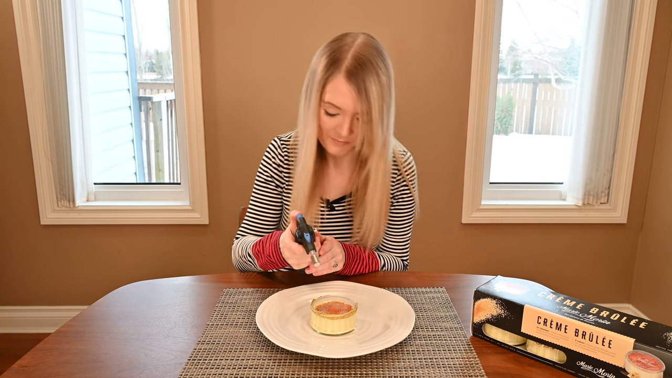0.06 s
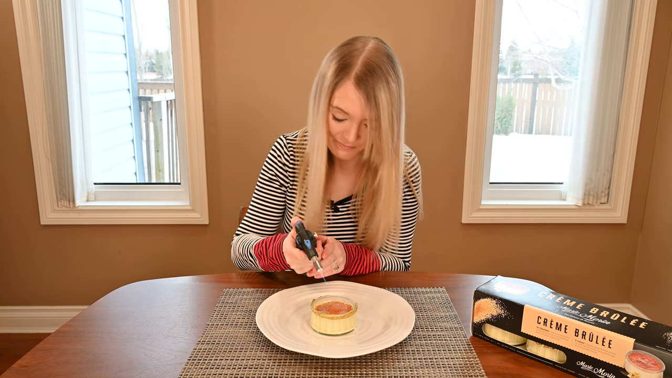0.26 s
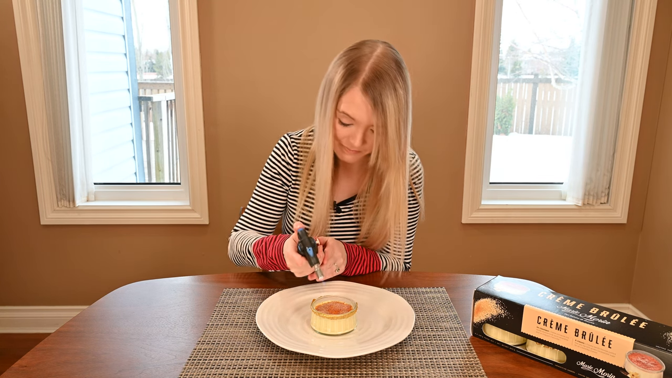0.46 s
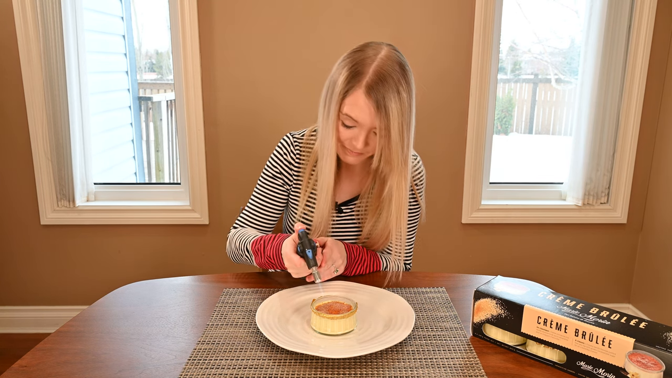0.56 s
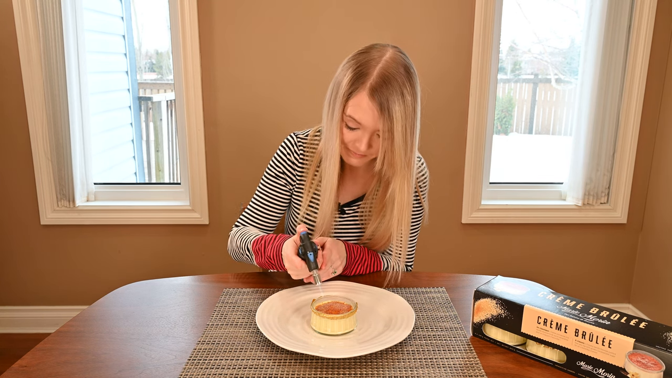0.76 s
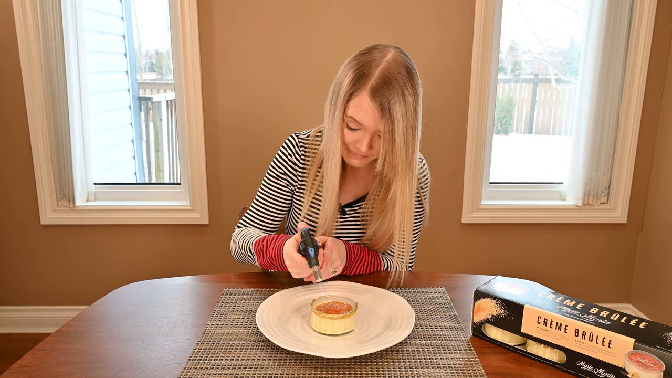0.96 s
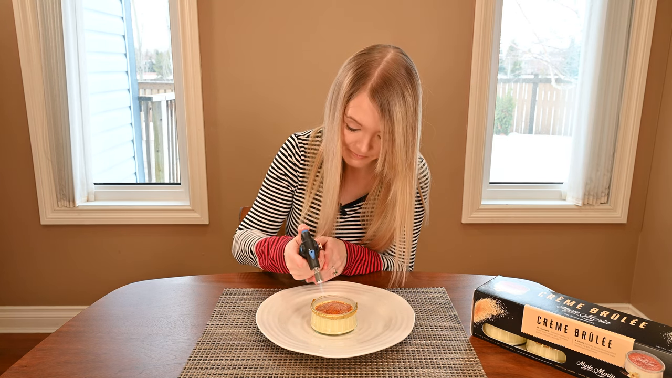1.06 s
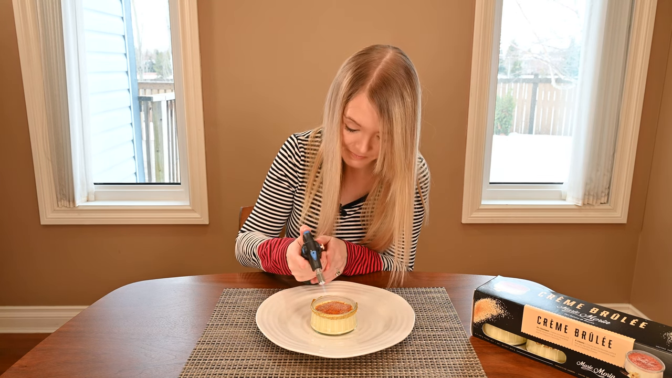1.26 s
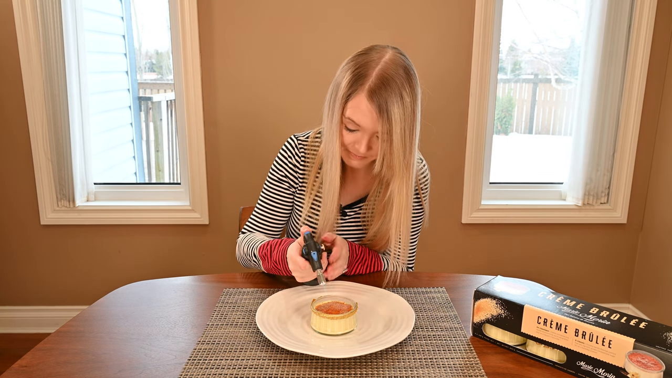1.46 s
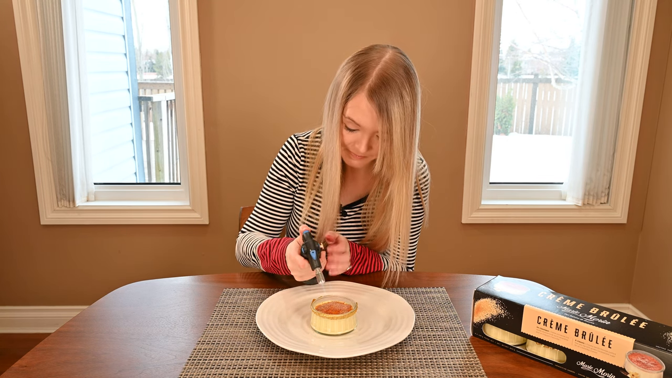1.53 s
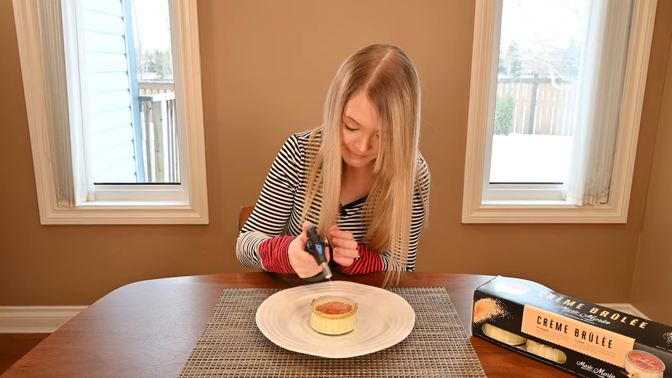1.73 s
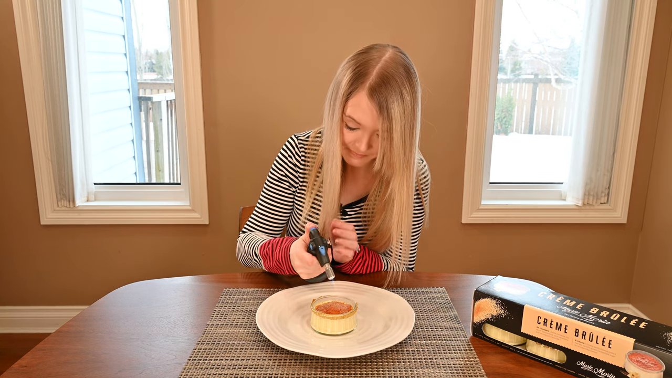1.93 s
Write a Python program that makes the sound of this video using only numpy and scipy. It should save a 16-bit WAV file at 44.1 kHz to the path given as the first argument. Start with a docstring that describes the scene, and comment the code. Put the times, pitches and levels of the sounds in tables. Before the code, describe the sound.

A handheld gas torch clicks, snaps alight with a soft thump, then hisses and roars steadily indoors.

```python
"""In a small hard-walled room with quiet air and a faint hum (sine tones), a hand rustles softly (noise).
The trigger of a gas torch clicks (bursts of tiny knocks ringing the grip) and gas starts to hiss
(noise shaped by the barrel). The igniter snaps (a burst ringing its housing), the gas catches with
a soft thump (two dying low tones) and the flame settles to a low roar (low noise) under the hiss.
Echoes and a dying tail add the room to the clicks, hiss and roar."""
import sys
import numpy as np
from scipy import signal
from scipy.fft import rfft, irfft
from scipy.io import wavfile
from scipy.ndimage import uniform_filter1d

SR = 44100
rng = np.random.default_rng(int(sys.argv[2]) if len(sys.argv) > 2 else 0)


def wav_out(sig):
    """Save sig, one row per channel (or a flat mono array), as 16-bit PCM at SR to the path in sys.argv[1]."""
    wavfile.write(sys.argv[1], SR, np.round(np.clip(np.atleast_2d(sig).T, -1, 1) * 32767).astype(np.int16))


N = 88200  # samples: 2 seconds

# tone colour of the quiet air: (frequency [Hz], relative level per Hz [dB])
AIR_COLOUR = [(18, -26), (30, -8.5), (278, 10.5), (521, -6.5), (752, -41), (1490, 0), (2710, -15.5),
              (4020, -11.5), (10300, -14), (15700, -30)]
AIR_DB = -72
# faint rustle of the hand before the gas is lit: (time [s], level [dB])
RUSTLE_LEVEL = [(0, -80), (.025, -73), (.05, -104), (.105, -78), (.125, -63.5), (.16, -67), (.22, -67),
                (.28, -77), (.3, -103)]
RUSTLE_HZ, RUSTLE_WIDTH_HZ = 1400, 2600
# appliance hum: (frequency [Hz], rms level [dB])
HUM_TONES = [(120, -82), (240, -91.5), (510, -80)]

# trigger clicks: (time [s], rough peak [dB], time for the slip to fall 60 dB [s],
#                  treble tilt [dB per octave], low edge [Hz])
TRIGGER_SLIPS = [(.0748, -53.5, 0.06, -0.5, 900), (.1084, -28.5, 0.014, 0.5, 500),
                 (.1215, -38.5, 0.0084, -8.5, 900), (.2290, -28.5, .005, 3.5, 1200),
                 (.2401, -10, 0.0067, 4, 1100)]
# ring of the plastic grip: (frequency [Hz], level [dB])
GRIP_RING = [(1200, -9.5), (1900, 5), (3450, 3), (4150, 5.5), (4860, 12.5), (5700, 8.5), (8350, 9),
             (11500, 3), (15400, -3.5)]
GRIP_T60_CYCLES, GRIP_LONGEST_T60_S = 24, .008  # each ring falls 60 dB in 24 cycles, or in 8 ms if sooner
# bare crack of a slip, without the ring: (frequency [Hz], level [dB])
CRACK_COLOUR = [(200, -33), (700, -62.5), (1500, -11.5), (3000, -42), (6500, 16.5), (10000, -38.5),
                (16000, -20)]
GRIP_CRACK_DB, HOUSING_CRACK_DB = 9.5, 12.5
SLIP_RISE_S = .0004
BLUR_HZ, SHARP_SHARE = 1500, 0.22  # for the sound sent to the room: blur width, share left sharp

# single echoes: (time [s]) and, in the same order, (level [dB])
ECHO_TIMES = [.0022, .0082, .0128, .0192]
ECHO_LEVELS = [-18, -24, -24.5, -22]
# how long the room tail lasts: (frequency [Hz], time to fall 60 dB [s])
TAIL_T60 = [(300, 0.23), (1300, 0.6), (3500, 0.52), (9000, 0.378), (15000, 0.06)]
# tone colour of the room tail: (frequency [Hz], relative level [dB])
TAIL_COLOUR_POINTS = [(300, -3), (1300, 8), (3500, -1), (6500, 2.5), (9000, 2.5), (15000, 12)]
TAIL_DB, TAIL_START_S = -12, 0.0047
BURN_ROOM_DB = 2.5  # extra room sound for the hiss and roar

# gas flow: (time [s], level of the main barrel resonance [dB])
GAS_FLOW = [(.13, -92), (.148, -62.5), (.19, -58), (.3, -52.5), (.5, -57.5), (.8, -57.5), (1.1, -57),
            (1.4, -58), (1.7, -58), (2, -57.5)]
BARREL_HZ, BARREL_SKIRT_DB = 4616, -10
BARREL_UNLIT_WIDTH_HZ, BARREL_LIT_WIDTH_HZ, BARREL_WIDENING_S = 500, 940, 0.058
# upper barrel resonances: (frequency [Hz], width [Hz])
BARREL_OVERTONES = [(6400, 500), (7750, 920), (11000, 2200), (13400, 1100), (15600, 690)]
# their levels as the nozzle turns: (time [s], then one level against the flow per resonance [dB])
NOZZLE_AIM = [(.15, -10, -37, -19, -28, -30), (.22, -15, -34, -24, -10, -10),
              (.47, -21.5, -14, -17, -13, -22), (.67, -31, -11, -17, -19, -16),
              (.9, -23, -8, -13.5, -14, -14), (1.1, -23, -14, -16, -13, -16.5),
              (1.4, -16, -13, -16.5, -12, -13), (1.65, -23, -14.5, -15, -16, -16),
              (1.8, -26.5, -16.5, -26, -16, -27), (2, -25, -14.5, -32, -25, -19)]
# broad hiss of the jet: (frequency [Hz], relative level per Hz [dB])
JET_COLOUR = [(1500, 4), (2500, 0.5), (3500, -2), (5500, 0), (8500, -1), (9500, -7), (12500, -1),
              (15700, -6.5)]
JET_DB = -11  # against the flow
SPIT_DB = 0.72  # flicker of the treble hiss
PATCHY_DB = 1  # drifting unevenness of hiss and roar

# igniter hammer: (time [s], rough peak [dB], time for the slip to fall 60 dB [s],
#                  treble tilt [dB per octave], low edge [Hz])
IGNITER_SLIPS = [(.2730, -3, 0.0027, 2.5, 400), (.2744, -20.5, 0.0036, 7, 412)]
# ring of the igniter housing: (frequency [Hz], level [dB], time to fall 60 dB [s])
HOUSING_RING = [(1380, -0.5, 0.03), (3357, 0, 0.038), (3930, 5.5, 0.015), (5830, 8, .005),
                (9070, 9, 0.00358), (10750, 3.5, 0.0084), (13400, 6.5, 0.0016), (13330, 2, 0.0046)]

# thump: start, overall level before the low cut, and two tones that each fall 60 dB in their T60
THUMP_S, THUMP_DB, THUMP_CUT_HZ = .2842, -24, 100
THUMP_HZ, THUMP_T60_S = 340, 0.0074
SWELL_HZ, SWELL_DB, SWELL_T60_S = 119, -6.5, 0.019  # level against the quicker tone

# tone colour of the flame: (frequency [Hz], relative level per Hz [dB])
FLAME_COLOUR = [(24, -67), (40, -42.5), (91, -34), (120, -9.5), (151, -8.5), (210, -7.5), (238, -2.5),
                (361, -3.5), (430, -0.5), (486, -4.5), (559, 1), (643, -3.5), (727, -5), (1050, -8),
                (1290, -9.5), (1650, -20.5), (1970, -18.5), (2300, -36.5), (2600, -20.5), (3380, -59),
                (5720, -120)]
# room resonances in the roar: (frequency [Hz], width [Hz], boost [dB])
ROOM_BOOM = [(118, 24, -4), (261, 59, -1), (448, 8.8, 1.5), (568, 75, 0), (697, 30, 9.5), (746, 32, 3)]
# roar of the flame: (time [s], level [dB])
ROAR_LEVEL = [(.283, -77.5), (.29, -56), (.35, -51), (.45, -51.5), (.7, -51), (1, -52), (1.3, -52.5),
              (1.6, -51.5), (2, -51)]
FLUTTER_DB = 0.62

LEFT_LAG_S, WIDE_ABOVE_HZ = 5e-6, 4500  # the left treble lags the right
EDGE_HZ = 15740  # nothing much is left above this


def gain_of(db):
    """Turn decibels into a plain factor."""
    return 10 ** (np.asarray(db) / 20)


def evened(x):
    """Scale a signal to an rms of 1."""
    return x / np.sqrt(np.mean(x ** 2) + 1e-20)


def read(points, hz):
    """Read a frequency table, with straight lines on a log frequency scale."""
    f, value = np.transpose(points)
    return np.interp(np.log(hz + 1), np.log(f + 1), value)


def curve(points, column=1):
    """Join a table column by straight lines in time."""
    rows = np.array(points)
    return np.interp(np.arange(N) / SR, rows[:, 0], rows[:, column])


def hump(hz, centre_hz, width_hz):
    """Gain of a resonance: strongest at its centre, weaker to both sides."""
    return 1 / (1 + (2 * (hz - centre_hz) / width_hz) ** 2)


def above(x, hz):
    """High-pass: weaken what lies below hz."""
    return signal.sosfilt(signal.butter(3, hz, "high", fs=SR, output="sos"), x)


def noise(gain, patchy_db):
    """Noise of rms 1 from random short spectra with drifting patches; gain maps Hz to a factor."""
    hz = np.fft.rfftfreq(2048, 1 / SR)
    a, b, patches = rng.standard_normal((N // 512 + 5, len(hz), 3)).T
    patches = uniform_filter1d(patches, size=14, axis=0)  # smooth over frequency
    patches = evened(uniform_filter1d(patches, size=6, axis=1))  # smooth over time
    spectra = (a + 1j * b) * gain(hz)[:, None] * gain_of(patchy_db * patches)
    return evened(signal.istft(spectra, nperseg=2048, noverlap=1536)[1][:N])


def flicker(size):
    """Smooth random wandering of rms 1; size is the smoothing in samples."""
    once = uniform_filter1d(rng.standard_normal(N), size=size)
    return evened(uniform_filter1d(once, size=size))


def slip_burst(shape):
    """A burst of random knocks, evened in tone colour while keeping its shape in time."""
    slip = rng.standard_normal(len(shape)) * shape
    for _ in range(6):
        z = rfft(slip)
        flat = irfft(z / abs(z))
        slip = np.tanh(flat / (shape + 1e-9) * np.linalg.norm(shape)) * shape
    return slip


def clicks(events, modes, crack_db):
    """Each slip is a dying burst of tiny knocks, heard as a bare crack and in the ring of the part.
    Row 0 goes straight to the listener; row 1, scattered every way with its ring blurred, feeds the room."""
    out, t = np.zeros((2, N)), np.arange(3072) / SR
    hz = np.fft.rfftfreq(len(t), 1 / SR)
    ring = sum(gain_of(db - 60 * t / t60) * np.sin(2 * np.pi * f * t) for f, db, t60 in modes)
    body = rfft(ring) + gain_of(crack_db + read(CRACK_COLOUR, hz))
    blur = np.sqrt(abs(uniform_filter1d(abs(body) ** 2, size=round(BLUR_HZ / hz[1]))))
    bodies = np.array([body, SHARP_SHARE * body + (1 - SHARP_SHARE) * blur])
    for s, db, t60, tilt_db, cut_hz in events:
        shape = np.minimum(t / SLIP_RISE_S, 1) * gain_of(-60 * t / t60)
        z = rfft(slip_burst(shape)) * gain_of(tilt_db * np.log2((hz + 500) / 4000))
        hit = above(irfft(z * bodies)[:, :2600], cut_hz)
        at = round(s * SR)
        out[:, at:at + 2600] += gain_of(db) * hit / np.linalg.norm(hit[0]) * 4
    return out


def quiet_air():
    """Still air of the room: a very soft steady noise."""
    return gain_of(AIR_DB) * noise(lambda hz: gain_of(read(AIR_COLOUR, hz)), 0.83)


def rustle():
    """The hand brushes faintly: a broad band of noise whose level wavers."""
    level = gain_of(curve(RUSTLE_LEVEL) + 2.4 * flicker(size=100))
    return level * noise(lambda hz: hump(hz, RUSTLE_HZ, RUSTLE_WIDTH_HZ), 4.7)


def hum():
    """An appliance hums: steady sine tones, each starting anywhere in its cycle."""
    t = np.arange(N) / SR
    return sum(np.sqrt(2) * gain_of(db) * np.sin(2 * np.pi * (f * t + rng.random()))
               for f, db in HUM_TONES)


def trigger():
    """The trigger slips through its travel and each slip rings the plastic grip."""
    grip = [(f, db, min(GRIP_T60_CYCLES / f, GRIP_LONGEST_T60_S)) for f, db in GRIP_RING]
    return clicks(TRIGGER_SLIPS, grip, GRIP_CRACK_DB)


def room(x, wet_db=0):
    """A few single echoes, then sparse taps of random sign, each band dying at its own speed."""
    taps = np.zeros(SR // 2)
    at = np.arange(0, len(taps) - 8, 8)
    taps[at + rng.integers(0, 8, len(at))] = rng.choice([-1., 1.], len(at))
    hz, t, z = signal.stft(taps, SR, nperseg=256)
    fade_db = read(TAIL_COLOUR_POINTS, hz)[:, None] - 60 * t / read(TAIL_T60, hz)[:, None]
    tail = signal.istft(z * gain_of(fade_db), SR, nperseg=256)[1]
    wait = np.zeros(round(TAIL_START_S * SR))
    tail = np.r_[wait, gain_of(TAIL_DB) * tail / np.linalg.norm(tail)]
    for s, db in zip(ECHO_TIMES, ECHO_LEVELS):
        tail[round(s * SR)] += gain_of(db)
    return gain_of(wet_db) * signal.fftconvolve(x, tail)[:N]


def barrel(width_hz):
    """Jet noise gathered at the main barrel resonance, with a wider, weaker skirt."""
    def gain(hz):
        peak = np.exp(-(2 * (hz - BARREL_HZ) / width_hz) ** 2)
        return peak + gain_of(BARREL_SKIRT_DB) * hump(hz, BARREL_HZ, 2 * width_hz)
    return noise(gain, PATCHY_DB)


def gas():
    """The jet hisses through the barrel, whose resonance widens once the flame burns."""
    lit = np.clip((np.arange(N) / SR - THUMP_S) / BARREL_WIDENING_S, 0, 1)
    main = np.sqrt(1 - lit) * barrel(BARREL_UNLIT_WIDTH_HZ) + np.sqrt(lit) * barrel(BARREL_LIT_WIDTH_HZ)
    treble = gain_of(JET_DB) * noise(lambda hz: gain_of(read(JET_COLOUR, hz)) * (hz > 800), PATCHY_DB)
    for k, (f, w) in enumerate(BARREL_OVERTONES):
        treble += gain_of(curve(NOZZLE_AIM, column=k + 1)) * noise(lambda hz: hump(hz, f, w), PATCHY_DB)
    return gain_of(curve(GAS_FLOW)) * (main + treble * gain_of(SPIT_DB * flicker(size=40)))


def igniter():
    """The hammer snaps and rings the igniter housing."""
    return clicks(IGNITER_SLIPS, HOUSING_RING, HOUSING_CRACK_DB)


def thump():
    """The gas cloud catches: a quick and a slower low tone die away together, both starting downward."""
    t = np.maximum(np.arange(N) / SR - THUMP_S, 0)
    quick = gain_of(-60 * t / THUMP_T60_S) * np.sin(2 * np.pi * THUMP_HZ * t)
    swell = gain_of(SWELL_DB - 60 * t / SWELL_T60_S) * np.sin(2 * np.pi * SWELL_HZ * t)
    return above(-gain_of(THUMP_DB) * (quick + swell), THUMP_CUT_HZ)


def flame():
    """Turbulent burning: a low fluttering roar, coloured by the room."""
    def gain(hz):
        boom_db = sum(db * hump(hz, f, w) for f, w, db in ROOM_BOOM)
        treble_fade = hump(np.maximum(hz, 2600), 2600, 600)  # no change below 2600 Hz
        return gain_of(read(FLAME_COLOUR, hz) + boom_db) * treble_fade
    return noise(gain, PATCHY_DB) * gain_of(curve(ROAR_LEVEL) + FLUTTER_DB * flicker(size=300))


def scene():
    """Add up all sounds and their room echoes, the same in both channels."""
    direct, scattered = trigger() + igniter() + thump()  # the thump joins both rows
    burn = gas() + flame()
    background = quiet_air() + rustle() + hum()
    mono = background + direct + room(scattered) + burn + room(burn, BURN_ROOM_DB)
    return np.array([mono, mono])


def record(dry):
    """The treble reaches the two channels a few microseconds apart; then the top is cut off."""
    hz = np.fft.rfftfreq(N, 1 / SR)
    turn = np.pi * hz * LEFT_LAG_S / (1 + (WIDE_ABOVE_HZ / (hz + 1)) ** 6)  # half the lag per side
    wide = irfft(rfft(dry) * np.exp(1j * np.array([-turn, turn])), N)
    low_pass = signal.firwin(1023, EDGE_HZ, window=("kaiser", 9), fs=SR)
    return signal.oaconvolve(wide, low_pass[None], "same")


dry = scene()
out = record(dry)
wav_out(out)
```